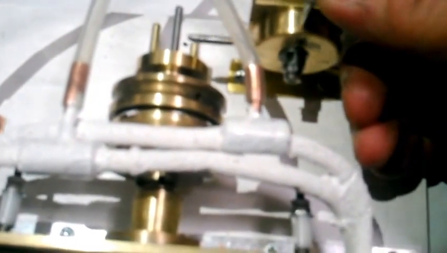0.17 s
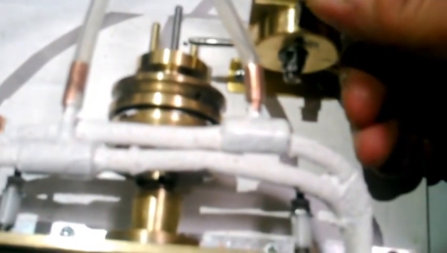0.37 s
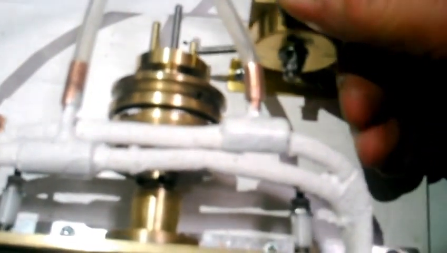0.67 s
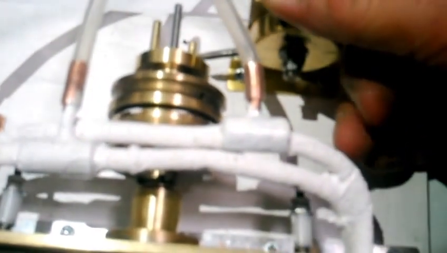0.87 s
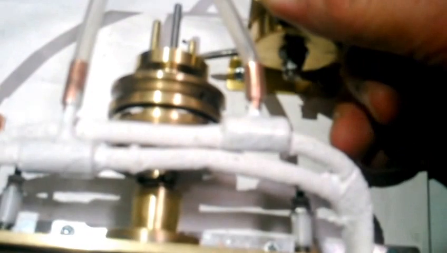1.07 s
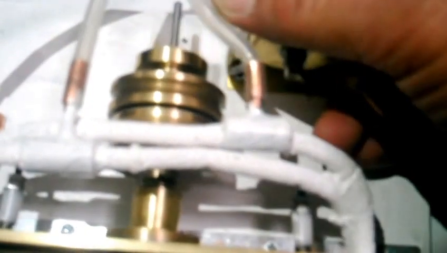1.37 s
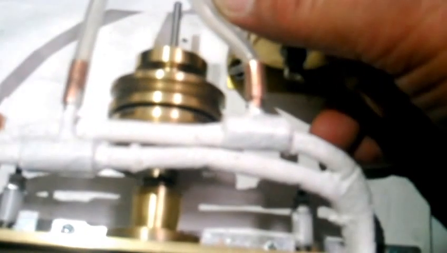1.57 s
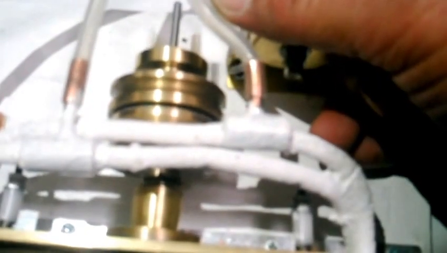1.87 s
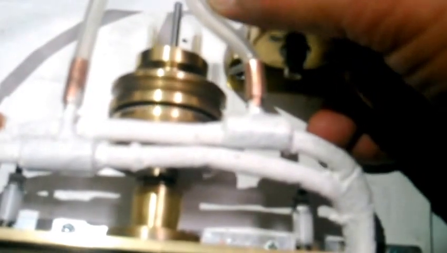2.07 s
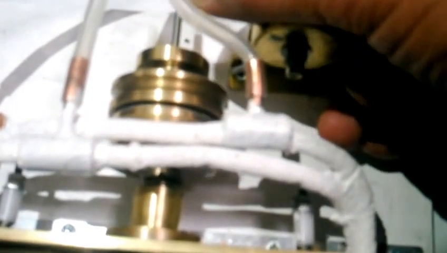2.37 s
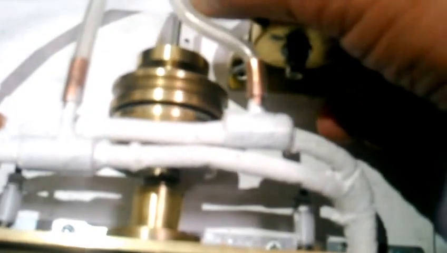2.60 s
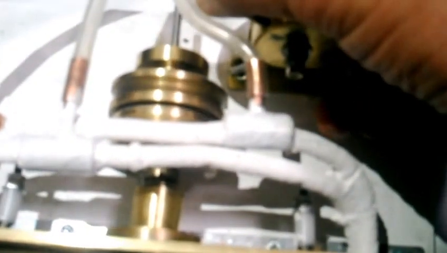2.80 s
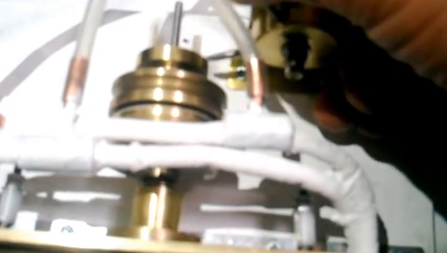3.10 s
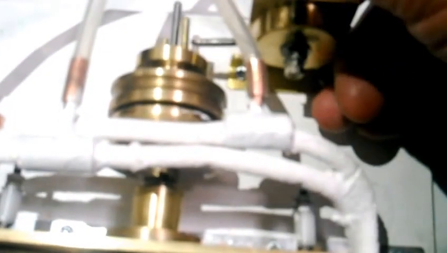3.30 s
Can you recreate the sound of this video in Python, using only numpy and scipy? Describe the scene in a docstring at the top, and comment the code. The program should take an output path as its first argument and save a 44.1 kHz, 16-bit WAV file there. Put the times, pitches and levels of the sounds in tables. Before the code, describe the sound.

A small model engine chuffs rapidly on compressed air over a humming, hissing compressor.

```python
"""A compressor whines and softly chirps throughout, and a leak in its feed hisses with each stroke.
Then, close by, a small brass model engine catches on the compressed air, runs for two seconds and stops.
It makes four beats to a turn: each is an impact and its rebound, which excite the resonances of the body,
with a turbulent puff of exhaust. Air blows past its valves, and bench and room add a faint echo."""
import sys
import numpy as np
from scipy import signal
from scipy.fft import rfft, irfft
from scipy.io import wavfile
from scipy.ndimage import uniform_filter1d

SR = 44100
rng = np.random.default_rng(int(sys.argv[2]) if len(sys.argv) > 2 else 0)


def inscribe(sig):
    """Save sig as 16-bit PCM at rate SR to the path in sys.argv[1].

    A 1-D sig is mono; a 2-D sig holds one channel per row.
    Samples are clipped to [-1, 1] before scaling.
    """
    pcm = np.round(np.clip(np.atleast_2d(sig).T, -1, 1) * 32767)
    wavfile.write(sys.argv[1], SR, pcm.astype(np.int16))


N = 152145


def amp(db):
    """Amplitude ratio of a level in decibels."""
    return 10 ** (np.asarray(db) / 20)


def unit_rms(x):
    """Normalisation to unit mean power."""
    return x / np.sqrt(np.mean(x ** 2) + 1e-20)


def curve(points):
    """Linear interpolation of (t/s, value) points at every sample."""
    return np.interp(np.arange(N) / SR, *np.transpose(points))


def add(mix, start_s, sound):
    """Superposition of a sound on a mix."""
    part = mix[max(round(start_s * SR), 0):][:len(sound)]
    part += sound[:len(part)]


def drift(seconds):
    """Low-passed Gaussian noise of rms 1 that varies on the given time scale."""
    spectrum = rfft(rng.standard_normal(N))
    return unit_rms(irfft(spectrum * np.exp(-(np.fft.rfftfreq(N, 1 / SR) * seconds * 2) ** 2), N))


def colour(x, spectrum, boost_db=0, size=8192):
    """Minimum-phase filtering at unit power gain, so a spectrum's levels are only relative."""
    hz = np.fft.rfftfreq(size, 1 / SR)
    f, level = np.transpose(spectrum)
    db = np.interp(np.log(hz + 1), np.log(f), level) + boost_db
    log_gain = np.log(amp(np.r_[db, db[-2:0:-1]]))
    taps = np.fft.ifft(np.exp(np.conj(signal.hilbert(log_gain)))).real[:size // 2]
    return signal.oaconvolve(x, taps / np.linalg.norm(taps))[:N]


# load on the compressor as it feeds the engine: t/s, share (0 to 1)
LOAD = [(1.35, 0.01), (1.7, 1), (3.25, 0.96), (3.45, 0.13)]
IDLE_HZ, LOADED_HZ, FIRST_STROKE_S = 23.33, 23.55, 0.0294
def strokes():
    """Phase as the integral of rate: the running count of compressor strokes."""
    return np.cumsum(IDLE_HZ + (LOADED_HZ - IDLE_HZ) * curve(LOAD)) / SR - FIRST_STROKE_S * IDLE_HZ


def stroke_swell(sharpness=3.2):
    """A periodic envelope that peaks at 1 on each stroke."""
    return np.abs(np.cos(np.pi * strokes())) ** (2 * sharpness)


# spectral lines of the motor: idle f/Hz, loaded f/Hz
MOTOR_LINES = [(677, 683), (714, 718.3), (723.6, 730), (737.2, 741.9), (800.3, 800.7)]
# strength and swing of those lines: idle level/dB, loaded level/dB, idle deviation/Hz
MOTOR_LEVELS = [(-90, -64.5, 0), (-70, -55.5, -1), (-50, -51.5, 17.5), (-53, -57.5, 10.5), (-69.5, -67, 4)]
def whine(loaded_swing_hz=12, waver_hz=0.25, throb_db=1.43, idle_pulse_db=2, lead_s=0.0057):
    """Beating between close motor lines, each modulated in frequency and amplitude by the strokes."""
    load, out = curve(LOAD), np.zeros(N)
    waver = waver_hz * drift(0.14)
    crank = np.sin(2 * np.pi * strokes())
    pulse_db = idle_pulse_db * (1 - load / 2) * np.cos(2 * np.pi * (strokes() + lead_s * IDLE_HZ))
    for (idle_hz, loaded_hz), (idle_db, loaded_db, swing_hz) in zip(MOTOR_LINES, MOTOR_LEVELS):
        hz = (1 - load) * (idle_hz + swing_hz * crank) + load * (loaded_hz + loaded_swing_hz * crank)
        db = idle_db + (loaded_db - idle_db) * load + pulse_db + throb_db * drift(0.029)
        cycles = np.cumsum(hz + waver) / SR + rng.random()
        out += np.sqrt(2) * amp(db) * np.sin(2 * np.pi * cycles)
    return out


# noise spectrum of compressor and room: f/Hz, level/dB
RUMBLE_SPECTRUM = [(8, -13), (22, 2.5), (50, -9), (130, -17.5), (260, -12), (430, -20.5), (620, -13),
                   (730, -1.5), (900, -19.5), (1080, -14.5), (1190, -15.5), (1300, -11.5), (1380, -27),
                   (1550, -19.5), (1750, -16.5), (3000, -24.5), (16000, -36)]
def rumble(db=-54):
    """Stationary noise of the compressor and the room, weighted to low frequencies."""
    return amp(db) * colour(rng.standard_normal(N), RUMBLE_SPECTRUM)


# envelope of the leak between strokes: t/s, level/dB
LEAK_ENVELOPE = [(0, -40), (.3, -38.5), (.8, -38), (1.3, -37.5), (1.5, -36.5), (3.25, -37.5), (3.33, -45.5),
                 (3.45, -41.5)]
# spectrum of the leak: f/Hz, level/dB
LEAK_SPECTRUM = [(100, -29.5), (1000, -18.5), (2500, -18.5), (4000, -13.5), (6000, -13), (8000, -8),
                 (10000, -4), (12400, 1), (14300, -4.5), (16000, -9)]
def leak(pulse_db=4, flutter_db=0.5):
    """Turbulent jet noise from the feed, amplitude-modulated by the strokes."""
    hiss = rng.standard_normal(N) * amp(pulse_db * stroke_swell() + flutter_db * drift(0.0017))
    return colour(unit_rms(hiss) * amp(curve(LEAK_ENVELOPE)), LEAK_SPECTRUM)


def thumps(hz=238, db=-65):
    """Band-limited noise, pulsed into a soft thump at each stroke."""
    band = signal.butter(2, [hz / 1.4, hz * 1.4], "band", fs=SR, output="sos")
    return amp(db) * stroke_swell() * unit_rms(signal.sosfilt(band, rng.standard_normal(N)))


def stroke_chirps(top_hz=1490, sag_hz=59.5, db=-57, delay_s=0.0087, half_width_s=0.0062):
    """Gaussian tone pulses: the compressor chirps in an arch of pitch after each stroke."""
    from_top_s = ((strokes() - delay_s * IDLE_HZ + 0.5) % 1 - 0.5) / IDLE_HZ
    arch = np.minimum((from_top_s / half_width_s) ** 2, 10)
    cycles = np.cumsum(top_hz - sag_hz * arch + 20 * drift(0.016)) / SR
    envelope = amp(db + 0.5 * drift(0.028)) * np.exp(-arch)
    return envelope * np.sqrt(2) * np.sin(2 * np.pi * cycles)


# modes of the brass body: f/Hz, bandwidth/Hz, gain/dB at each of the places a, b, c, d in a turn
BODY_MODES = [(1314, 196, 6, 11.4, 12, 1.5), (1990, 490, 4, 0.71, 3.5, -6), (2777, 190, 7, 2.7, 3, 4.5),
              (3144, 145, 9.5, 8.2, 5.5, 7.5), (3490, 380, -0.5, 2, 2.5, -3), (4510, 190, -0.5, 4.4, 3, 4),
              (6550, 540, 9, 7.1, 3.5, 4), (7300, 700, 0, 4.4, 6, 3.5), (10180, 300, 7.5, 2.5, 3, 6),
              (10600, 320, 6, 2.4, -1, 1.5), (11430, 330, -1.5, 2, 1.5, 3.5), (12400, 350, 11.5, 1, -1, -5),
              (13700, 250, 7.5, 4, 7, 0), (13900, 280, 9, 5, 1, 11)]
SHELF_HZ, EXHAUST_BODY_SHARE = 4700, 0.42
def body_db(share, shelf_db, place=None, spread_db=2, size=8192):
    """Modal resonance: peaks in dB on a low shelf, varied by place and by chance, or else averaged."""
    hz = np.fft.rfftfreq(size, 1 / SR)
    db = shelf_db / (1 + (hz / SHELF_HZ) ** 2)
    for centre, width, *gains in BODY_MODES:
        gain = np.mean(gains) if place is None else gains[place] + spread_db * rng.standard_normal()
        db += share * gain / (1 + (2 * (hz - centre) / width) ** 2)
    return db


# envelope of the air escaping through the engine: t/s, level/dB
BLOW_BY_ENVELOPE = [(1.32, -54), (1.348, -28), (1.385, -34), (1.445, -34), (1.475, -44), (1.7, -42),
                    (2.9, -41.5), (3.25, -41.5), (3.29, -40.5), (3.32, -52)]
# spectrum of the exhaust, steady or in puffs: f/Hz, level/dB
EXHAUST_SPECTRUM = [(40, -11), (170, -10.5), (400, -13), (650, -6), (950, -13.5), (1400, -7), (2600, -9),
                    (4800, -4.5), (7000, -4.5), (9000, -1), (10800, 0.5), (12800, -0.5), (14500, -14),
                    (16000, -6.5)]
def blow_by(flutter_db=2):
    """Turbulent flow past the engine's valves, filtered by the body's resonances."""
    hiss = rng.standard_normal(N) * amp(curve(BLOW_BY_ENVELOPE) + flutter_db * drift(0.0046))
    return colour(hiss, EXHAUST_SPECTRUM, body_db(EXHAUST_BODY_SHARE, shelf_db=-11))


# spurts as the engine catches and after the second beat of some turns: t/s, level/dB
SPIT_EVENTS = [(1.372, -46), (2.678, -34.5), (2.802, -34), (2.93, -33.5), (3.058, -34.5)]
# spectrum of the spurts: f/Hz, level/dB
SPIT_SPECTRUM = [(100, -12), (2500, -5.5), (3600, -3.5), (4300, 2), (5000, -3.5), (6500, -12), (9000, -24),
                 (16000, -6.5)]
def spits(length_s=0.024, rough_db=4):
    """Short spurts of exhaust noise, roughened by fast random amplitude modulation."""
    swell, envelope = np.sqrt(np.hanning(round(length_s * SR))), np.zeros(N)
    for start_s, db in SPIT_EVENTS:
        add(envelope, start_s, amp(db) * swell)
    ragged = unit_rms(rng.standard_normal(N) * amp(rough_db * drift(0.00095)))
    return colour(envelope * ragged, SPIT_SPECTRUM)


def burst(rise_s, decay_s, size):
    """Amplitude of a damped transient: linear rise, exponential decay."""
    t = np.arange(size) / SR
    return np.minimum(t / rise_s, 1) * np.exp(-np.maximum(t - rise_s, 0) / decay_s)


# the beat at places a to d: knock level/dB, knock decay/s, rebound delay/s, rebound level/dB,
# puff level/dB, puff decay/s, low shelf/dB, tick level/dB
BEAT_SHAPES = [(-16.5, 0.0022, 0.0038, -21.5, -31, 0.0084, -0.5, -4),
               (-27, 0.0027, 0.0022, -23, -21.5, 0.011, -4.5, -12),
               (-23.5, 0.0035, 0.0061, -21.5, -28, 0.012, -0.5, -16),
               (-17, 0.0013, 0.0033, -19.5, -30.5, 0.012, 0, 1.5)]
# spectrum of a knock on the brass: f/Hz, level/dB
KNOCK_SPECTRUM = [(40, -41), (170, -21), (400, -26.5), (650, -18), (950, -22.5), (1400, -20.5), (2600, -13),
                  (4800, -15.5), (7000, -13.5), (9000, -12.5), (10800, -1.5), (12800, -4.5), (14500, -21),
                  (16000, -15)]
PUFF_LEAD_S, PUFF_RISE_S, KNOCK_RISE_S, TICK_HZ = 0.00097, 0.0018, 0.00072, 8500
def beat(place, rebound_spread_s=0.00029, rebound_spread_db=1, size=4096):
    """Impact excitation: a knock with a hard tick and its rebound ring the body over an exhaust puff."""
    knock_db, knock_s, delay_s, rebound_db, puff_db, puff_s, shelf_db, tick_db = BEAT_SHAPES[place]
    delay_s += rebound_spread_s * rng.standard_normal()
    rebound_db += rebound_spread_db * rng.standard_normal()
    crack, air = rng.standard_normal((2, size))
    power, impulse = np.zeros((2, size))
    knock = burst(KNOCK_RISE_S, knock_s, size)
    # incoherent bursts add in power
    add(power, PUFF_LEAD_S, (amp(knock_db) * knock) ** 2)
    add(power, PUFF_LEAD_S + delay_s, (amp(rebound_db) * knock) ** 2)
    add(impulse, PUFF_LEAD_S + KNOCK_RISE_S, amp([tick_db]))
    tick = signal.sosfilt(signal.butter(2, TICK_HZ, "high", fs=SR, output="sos"), impulse)
    impact = np.sqrt(power) * crack + tick
    puff = amp(puff_db) * burst(PUFF_RISE_S, puff_s, size) * unit_rms(air)
    sources = (impact, KNOCK_SPECTRUM, 0.99), (puff, EXHAUST_SPECTRUM, EXHAUST_BODY_SHARE)
    return sum(colour(x, spectrum, body_db(share, shelf_db, place, size=2048), size=2048)
               for x, spectrum, share in sources)


# beats of the engine: t/s, level/dB, place in the turn (a to d)
ENGINE_BEATS = [ (1.3915,-5.5,"b"), (1.406,-3.5,"d"), (1.423,1,"a"), (1.458,-3,"d"), (1.48,3.5,"a"),
                (1.506,-12,"b"), (1.533,2,"c"), (1.5594,1,"d"), (1.58,2.5,"a"), (1.599,-10,"b"),
                (1.631,0.5,"c"), (1.6572,0,"d"), (1.679,-0.5,"a"), (1.698,-8.5,"b"), (1.733,-0.5,"c"),
                (1.762,-0.5,"d"), (1.783,2,"a"), (1.806,-6.5,"b"), (1.8403,0,"c"), (1.8724,-0.5,"d"),
                (1.8967,-0.5,"a"), (1.922,-2.5,"b"), (1.9564,0,"c"), (1.9897,1.5,"d"), (2.0155,2.5,"a"),
                (2.042,-2,"b"), (2.076,0.5,"c"), (2.112,0,"d"), (2.137,2,"a"), (2.1653,-2,"b"),
                (2.2008,0,"c"), (2.2356,0,"d"), (2.2615,3,"a"), (2.29,-2.5,"b"), (2.3262,0.5,"c"),
                (2.3608,-1,"d"), (2.3865,2.5,"a"), (2.415,-1.5,"b"), (2.4521,0,"c"), (2.4869,-1.5,"d"),
                (2.5131,4.5,"a"), (2.5422,-1.5,"b"), (2.579,0,"c"), (2.6142,-1,"d"), (2.6392,4.5,"a"),
                (2.669,-2,"b"), (2.7055,0.5,"c"), (2.7404,-1,"d"), (2.7665,3.5,"a"), (2.7957,-1,"b"),
                (2.8321,0.5,"c"), (2.8672,0,"d"), (2.893,3.5,"a"), (2.922,-1,"b"), (2.96,0,"c"),
                (2.9942,1.5,"d"), (3.0204,3,"a"), (3.0494,-0.5,"b"), (3.0867,0.5,"c"), (3.1222,2,"d"),
                (3.148,3,"a"), (3.178,0,"b"), (3.2152,0.5,"c"), (3.2527,-4,"d"), (3.2838,-3.5,"a"),
                (3.3338,-12.5,"c")]
def engine():
    """A quasi-periodic train of transients, each ringing the body a little differently."""
    out = np.zeros(N)
    for knock_at_s, db, place in ENGINE_BEATS:
        add(out, knock_at_s - PUFF_LEAD_S, amp(db) * beat("abcd".index(place)))
    return out


# lift of the beats' lows and mids: t/s, level/dB
SHELF_GAIN = [(1.55, 3.15), (2.05, 2), (2.5, 2.5), (3.2, -0.2)]
def fuller(x):
    """Time-varying shelf filtering: the beats sound fuller at first."""
    low = signal.sosfiltfilt(signal.butter(2, SHELF_HZ, fs=SR, output="sos"), x)
    return x + (amp(curve(SHELF_GAIN)) - 1) * low


def echoes(x, db=-17.5, t60_s=0.083, gap_s=0.003, size=8192):
    """Reverberation from bench and room: convolution with exponentially decaying noise."""
    t = np.arange(size) / SR
    tail = rng.standard_normal(size) * amp(-60 * t / t60_s) * (t > gap_s)
    return amp(db) * signal.oaconvolve(x, tail / np.linalg.norm(tail))[:N]


def scene():
    """Superposition of the air supply, the engine and its echoes, in mono."""
    supply = whine() + rumble() + leak() + thumps() + stroke_chirps()
    beats = fuller(spits() + engine())
    return (supply + blow_by() + beats + echoes(beats))[None]


def record(dry, cutoff_hz=15850):
    """Band limiting by a linear-phase low-pass filter."""
    taps = signal.firwin(511, cutoff_hz, window=("kaiser", 8), fs=SR)
    return signal.oaconvolve(dry, taps[None], "same")


dry = scene()
out = record(dry)
inscribe(out)
```